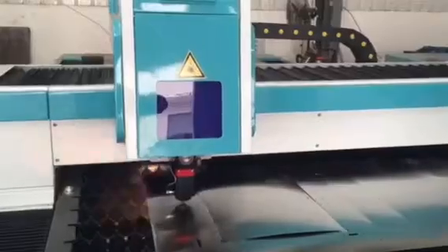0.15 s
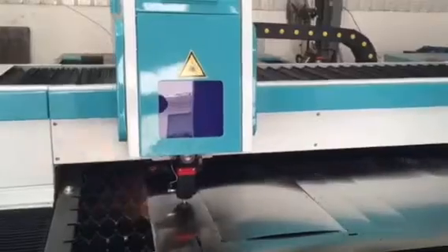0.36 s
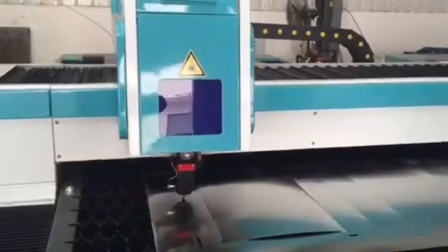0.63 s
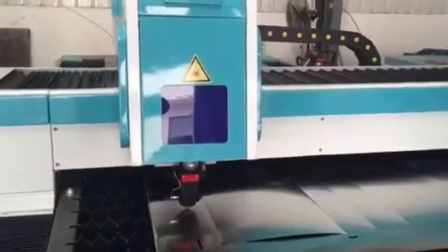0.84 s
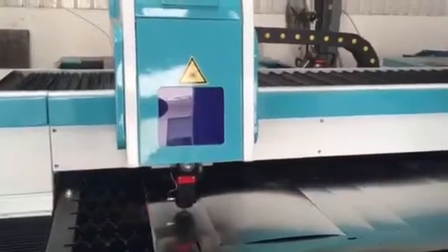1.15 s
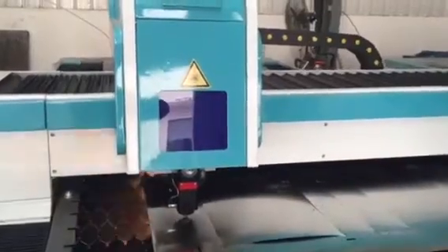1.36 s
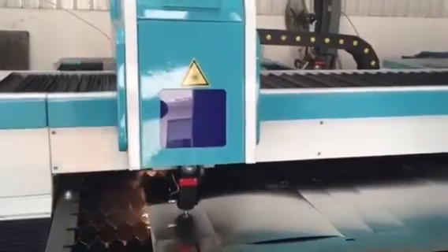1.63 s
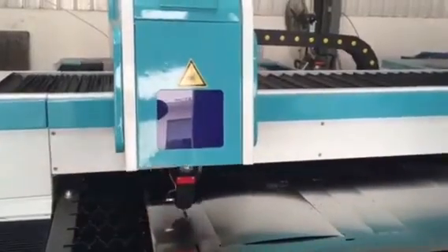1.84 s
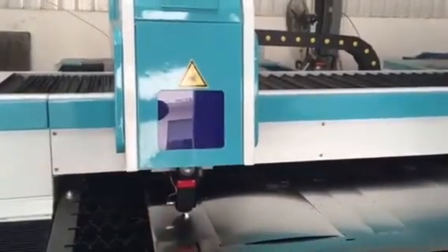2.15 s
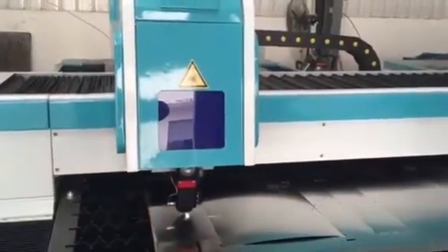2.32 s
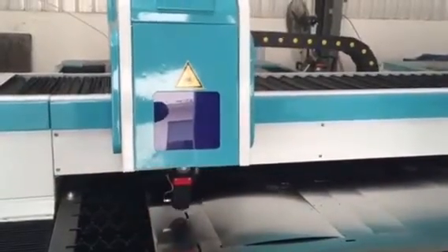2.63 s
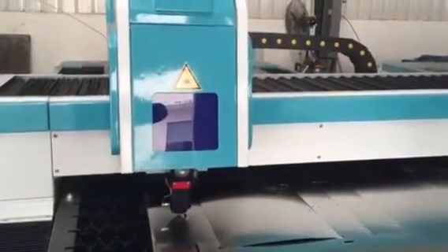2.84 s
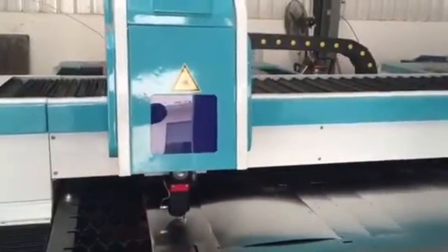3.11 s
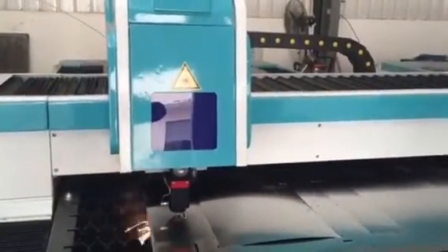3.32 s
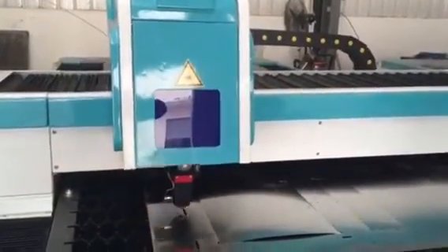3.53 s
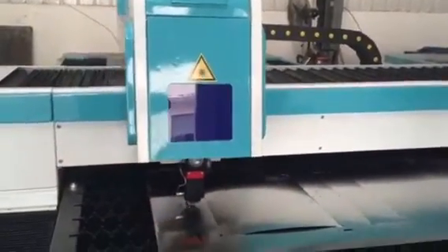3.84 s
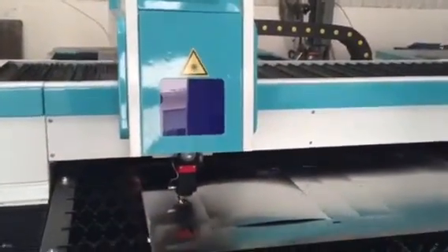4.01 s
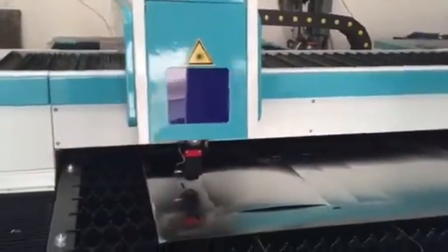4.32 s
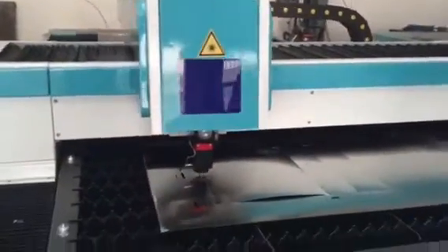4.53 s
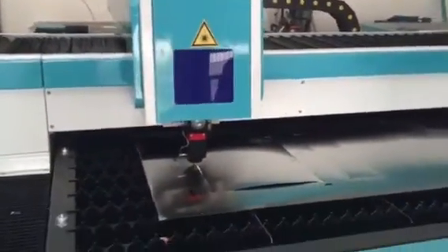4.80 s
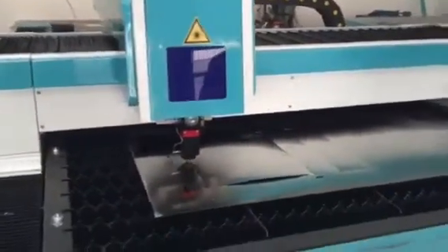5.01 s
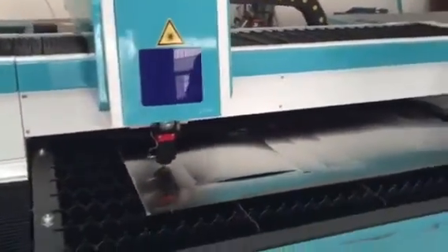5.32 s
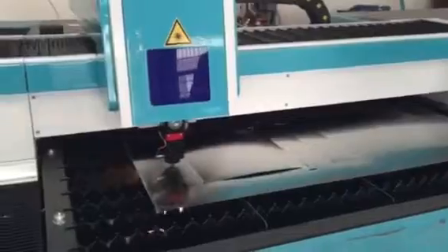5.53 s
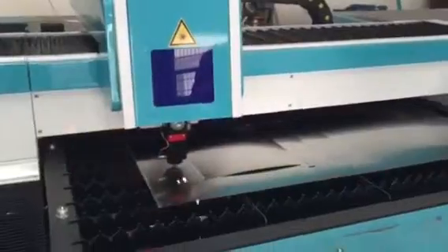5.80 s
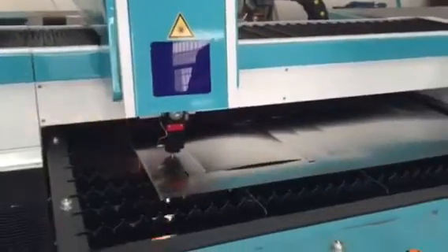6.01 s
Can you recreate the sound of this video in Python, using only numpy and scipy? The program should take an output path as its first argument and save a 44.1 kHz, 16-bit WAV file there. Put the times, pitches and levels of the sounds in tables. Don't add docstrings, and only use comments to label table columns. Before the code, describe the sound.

A laser cutter's gas jet hisses and roars through thin sheet metal, with sharp metallic snaps, brief whistles and low fan hum in a workshop.

```python
import sys
import numpy as np
from scipy import signal
from scipy.fft import rfft, irfft
from scipy.io import wavfile
from scipy.ndimage import uniform_filter1d

SR = 44100
rng = np.random.default_rng(int(sys.argv[2]) if len(sys.argv) > 2 else 0)


def voltage_ratio(level):
    return 10 ** (np.asarray(level, float) / 20)


def store_wav(level_fs):
    pcm = np.round(np.clip(np.atleast_2d(level_fs), -1, 1) * 32767)
    wavfile.write(sys.argv[1], SR, pcm.T.astype(np.int16))


N = 271656
T = np.arange(N) / SR
HZ = np.fft.rfftfreq(N, 1 / SR)

# time_s, level_db
FAN_LEVEL = [(0.0, -37.5), (0.68, -36.5), (1.22, -37.5), (1.92, -37.5), (2.95, -40), (3.29, -37),
             (3.96, -39.5), (4.37, -39.5), (4.72, -38.5), (5.2, -35.5), (6.04, -36.5), (6.16, -35.5)]
# frequency_hz, density_db (per Hz)
FAN_COLOUR = [(15, -44), (25, -21), (54, -2.5), (107, 2.5), (236, 3), (267, -2.5), (395, -5), (474, -10.5),
              (609, -0.5), (700, -3.5), (910, -45), (1540, -120)]
# pitch_hz, level_db
MOTOR_TONES = [
    (99, -53),
    (197, -51),
    (242, -48),
]
# start_s, end_s, level_db
GUSTS = [
    (1.12, 1.13, -36),
    (1.958, 2.005, -29),
    (2.654, 2.759, -28),
    (3.61, 3.664, -25.5),
    (3.685, 3.72, -26),
    (4.39, 4.53, -32.5),
    (5.237, 5.327, -34),
]
GUST_RISE_S, GUST_FALL_S = .007, .006
# frequency_hz, density_db (per Hz)
GUST_COLOUR = [(20, -46), (38, -20), (55, -3.0), (200, -5), (450, -12), (900, -22), (3000, -72)]
# start_s, peak_db, pitch_hz
BUMPS = [
    (1.105, -28, 120),
    (2.665, -9, 200),
    (2.715, -16, 200),
    (2.741, -20, 120),
    (3.631, -12.5, 111),
    (3.654, -21, 170),
    (3.715, -16, 160),
    (4.411, -22, 180),
    (4.458, -19, 200),
    (4.514, -10.5, 119),
]
# start_s, peak_db, ring_db (relative), first_pitch_hz
SNAPS = [
    (.6185, -13.5, -10, 2600),
    (1.804, -17, -7, 3300),
    (2.5288, -11.5, -6, 2800),
    (2.662, -20, -9, 2000),
    (3.4786, -9.5, -4, 3600),
    (5.0778, -13.5, -9, 3100),
]
# pitch_hz, level_db, decay_t60_s
SHEET_MODES = [
    (620, -4, .03),
    (1150, -9, .02),
    (2000, -6, .02),
    (2950, 0, .04),
]
# start_s, end_s, from_hz, to_hz, level_db
WHISTLES = [(0.01, .16, 3000, 3500, -34), (0.622, 0.689, 1694, 1094, -28), (.74, 0.88, 2960, 3410, -28),
            (.52, .62, 3000, 3190, -34), (1.028, 1.33, 3050, 3240, -35.5),
            (1.803, 1.866, 3200, 3000, -20.5), (1.821, 1.887, 1143, 1104, -23.5),
            (1.895, 1.987, 3000, 3200, -23), (1.895, 1.977, 3900, 4330, -23),
            (2.164, 2.228, 3100, 3920, -24), (2.253, 2.724, 2320, 2310, -30),
            (3.003, 3.04, 2890, 3110, -20.5), (2.54, 2.62, 1060, 1170, -27), (3.188, 3.24, 3350, 3400, -24),
            (3.28, 3.34, 3300, 3520, -23.5), (3.57, 3.63, 4000, 4400, -20),
            (4.399, 4.485, 3300, 1498, -16.5), (5.085, 5.224, 1100, 1802, -27),
            (5.083, 5.12, 3100, 2900, -28), (5.201, 5.237, 2390, 3080, -26.5),
            (5.26, 5.33, 2000, 3200, -30)]
STEADY_WIDTH_HZ, WIDTH_PER_GLIDE = 70, 1.05
JET_ZONES_HZ = [
    900,
    1950,
    3400,
    5900,
    9000,
]
# frequency_hz, density_db (per Hz)
JET_COLOUR = [(210, -20), (350, -15.5), (475, -22.5), (616, -14.5), (755, -10.5), (2270, -3), (3410, 1.5),
              (3890, -2), (6360, -9.5), (7460, -10.5), (8880, -10), (10100, -12), (11200, -26),
              (14600, -60), (22000, -120)]
# centre_hz, width_hz, lift_db
BED_RESONANCES = [(620, 75, 4), (765, 50, -4), (875, 40, 3), (1140, 60, 3), (1310, 50, -4), (1470, 55, 4.5),
                  (1560, 60, -2), (1890, 50, -4.5), (1960, 60, 2), (2315, 90, 5), (2440, 80, -4),
                  (2595, 110, 2.5), (2780, 70, 2.5), (2905, 40, -3), (2955, 50, 4), (3250, 60, -4.5),
                  (3380, 70, 3.5), (4060, 45, 4), (4170, 80, 3), (4270, 60, 2), (4530, 60, 2.5),
                  (5000, 150, -2), (5400, 100, 2), (5780, 50, -3), (6145, 60, 3), (6270, 65, 4),
                  (6530, 60, 2.5), (6840, 50, 3), (7600, 700, -3), (8660, 80, 4)]
IDLE_DB = [-7.5, -13, -18, -9.5, -6.5]
# peak_s, lift_db, half_length_s
SLATS = [(.14, 3.5, 0.072), (0.285, -4, 0.12), (.53, 1.5, 0.064), (1.19, -0.5, .05), (1.526, -2, 0.14),
         (1.882, -1.5, 0.1), (2.36, 0, .1), (2.67, -4.5, 0.052), (3.134, -2.5, 0.088), (3.25, 5.5, .025),
         (3.33, -1, .06), (3.417, -1, .06), (3.72, 2, .05), (4.16, 2, .14), (4.31, -4, 0.065),
         (5.02, -2.5, .05), (5.31, 4.5, .06), (5.42, 1, .06), (5.602, 1, .06), (5.793, -4.5, .06),
         (5.95, -3.5, 0.049)]
SLAT_SHARE = [0.54, 0.78, .3, 0.046, 0.05]
# start_s, end_s, lift_db, rise_s, fall_s
CUTS = [(-.1, 0.14, 3, .02, 0.044), (0.48, .88, 6.5, 0.13, 0.24), (0.98, 1.116, 4, 0.018, 0.13),
        (1.194, 1.32, 4.5, .08, 0.068), (1.658, 1.8, 6, 0.13, .011), (1.8, 2.079, 12, 0.012, .008),
        (2.08, 2.152, 11, 0.01, 0.035), (2.15, 4.266, 14, 0.028, 0.0052), (4.261, 4.478, 9.5, 0.0075, 0.13),
        (4.65, 5.343, 5.5, 0.057, .04), (5.187, 5.328, 3, .03, .015), (5.45, 5.617, 3.5, .02, 0.1),
        (5.842, 5.88, 2, .03, 0.029), (6.033, 6.3, 4.5, .06, .02)]
CUT_SHARE = [0.29, 1, 0.99, 0.68, .36]
# deepest_s, depth_db, sink_s, lift_s
CHOKES = [
    (.585, -1.5, 0.023, 0.025),
    (.99, -7, 0.041, 0.043),
    (2.11, -1, .03, .08),
    (2.848, -7, 0.023, 0.022),
    (2.86, -5, 0.091, 0.079),
    (3.472, -4, 0.013, .006),
    (3.835, -10.5, 0.052, 0.067),
    (4.64, -1.5, 0.062, .03),
    (5.16, 0, 0.029, .03),
    (5.45, -4, 0.044, .025),
]
CHOKE_SHARE = [.6, .8, .9, 1, 1.1]
# peak_s, lift_db, half_length_s
FLARES = [(.39, 3.5, 0.13), (.67, 3.5, 0.059), (0.804, 6.5, 0.09), (1.85, 1, 0.028), (1.965, 7, 0.084),
          (2.05, 2.5, 0.039), (2.22, 4.5, 0.1), (2.31, 3, .07), (2.493, 3.5, 0.15), (2.67, 4, 0.064),
          (2.734, 1.5, 0.043), (3.518, 5.5, 0.081), (3.024, 0.5, 0.086), (3.147, 0.5, 0.056),
          (3.42, 3.5, .05), (3.6, 4, .05), (3.648, 10, 0.044), (3.714, 6, 0.022), (4.408, 10.5, 0.038),
          (4.496, 3.5, 0.063), (4.783, 3.5, .06), (4.85, 2, 0.032), (4.914, 4.5, .04), (4.972, 7, .035),
          (5.088, 1.5, 0.11), (5.236, 7, 0.057), (5.28, 1.5, 0.065), (5.444, -6, .03), (5.983, 5, .04)]
FLARE_SHARE = [0.05, .1, .3, .85, 1.05]
# start_s, end_s, lift_db, fall_s
HOLLOWS = [
    (0.61, 0.678, 6, 0.31),
    (1.795, 1.866, 8.5, 0.27),
    (2.155, 2.22, 2.5, 0.033),
    (2.503, 2.59, 5, 0.35),
    (3.583, 3.725, 4.5, 0.059),
    (4.384, 4.47, 8, 0.13),
    (4.68, 4.93, 6.5, 0.059),
    (5.06, 5.302, 6.5, 0.036),
]
HOLLOW_SHARE = [0.89, 0.17, 0.033, 0.037, 0.069]
FILL_S = 0.018
# centre_s, low_hz, high_hz
SIDE_PATCHES = [(.074, 4130, 5250), (.074, 5590, 6970), (.26, 4130, 5250), (.492, 5160, 6370),
                (.492, 6900, 8350), (.492, 9600, 11000), (.585, 5160, 6970), (1.142, 5590, 6970),
                (1.281, 6200, 8350), (1.537, 5160, 6970), (2.28, 5590, 6970), (2.28, 7500, 8950),
                (3.046, 5590, 6970), (3.046, 8180, 9640), (3.139, 8900, 10350), (3.441, 8900, 10350),
                (4.045, 4130, 5770), (4.091, 4560, 5700), (4.323, 8180, 9640), (4.346, 5160, 6370),
                (4.741, 8900, 10350), (5.159, 7570, 10350), (5.298, 4130, 5770), (5.716, 4130, 5250),
                (5.809, 8900, 10350), (6.134, 4130, 7570)]


def colour(points):
    hz, db = np.transpose(points)
    return voltage_ratio(np.interp(np.log(HZ + 1), np.log(hz), db))


def unit(x):
    return x / np.sqrt(np.mean(x ** 2))


def walk(rate, size=N):
    hold = int(SR / rate)
    steps = np.repeat(rng.standard_normal(size // hold + 1), hold)
    smooth = uniform_filter1d(uniform_filter1d(steps, hold), hold)
    return unit(smooth[:size])


def swell(on, off, rise, fall):
    return np.clip((T - on) / rise, 0, 1) * np.clip(1 + (off - T) / fall, 0, 1)


def bands(gain, lo_hz, count):
    noise = rfft(rng.standard_normal(N)) * gain
    place = 3 * np.log2((HZ + 1) / lo_hz)
    windows = (np.cos(np.pi / 2 * np.clip(place - k, -1, 1)) ** 2 for k in range(count))
    return [irfft(noise * window, N) for window in windows]


def fan_rumble(flicker_db=2.5):
    parts = bands(colour(FAN_COLOUR), 26.35, count=16)
    air = unit(sum(part * voltage_ratio(flicker_db * walk(6)) for part in parts))
    hum = 0
    for hz, db in MOTOR_TONES:
        level = voltage_ratio(db + 1.2 * walk(4.6))
        turn = 2 * np.pi * np.cumsum(hz + 1.486 * walk(4)) / SR
        hum = hum + level * np.sin(turn)
    s, db = np.transpose(FAN_LEVEL)
    return air * voltage_ratio(np.interp(T, s, db) + 2.2) + np.sqrt(2) * hum


def gusts(lumpy_db=1.8):
    wind = unit(irfft(rfft(rng.standard_normal(N)) * colour(GUST_COLOUR), N))
    wind = wind / np.sqrt(uniform_filter1d(wind ** 2, 2500))
    gate = sum(voltage_ratio(db) * swell(on, off, GUST_RISE_S, GUST_FALL_S) for on, off, db in GUSTS)
    out = wind * gate * voltage_ratio(lumpy_db * walk(70))
    t = T[:SR // 20]
    for s, db, hz in BUMPS:
        turns = hz * (t + 0.0029 * (1 - np.exp(-t / 0.0014)))
        bump = np.sin(2 * np.pi * turns) * np.exp(-t / 0.0069) * 0.56
        out[int(s * SR):][:len(t)] += voltage_ratio(db) * bump
    return out


def snaps():
    t, out = T[:SR // 10], np.zeros(N)
    detune = rng.standard_normal((len(SNAPS), len(SHEET_MODES)))
    last_hz, sag_s = 520, .0014
    fade = np.exp(-(t / .0045) ** 4)
    plain = (.55 + t / .006) * fade
    spiked = (.55 + t / .006 + np.exp(-t / .0004)) * fade
    ring_onset = 1 - np.exp(-(t / .002) ** 2)
    for (s, db, ring_db, first_hz), jitter in zip(SNAPS, detune):
        turns = last_hz * t + (first_hz - last_hz) * sag_s * (1 - np.exp(-t / sag_s))
        shape = spiked if first_hz > 3000 else plain
        chirp = np.sin(2 * np.pi * turns) * shape
        ring = 0
        for (hz, mode_db, t60), j in zip(SHEET_MODES, jitter):
            mode = np.sin(2 * np.pi * hz * (1 + 0.019 * j) * t)
            ring = ring + voltage_ratio(mode_db) * mode * 1000 ** (-t / t60)
        out[int(s * SR):][:len(t)] += voltage_ratio(db) * (chirp + voltage_ratio(ring_db) * ring * ring_onset)
    return out


def whistles():
    out = np.zeros(N)
    for on, off, from_hz, to_hz, db in WHISTLES:
        width_hz = STEADY_WIDTH_HZ + WIDTH_PER_GLIDE * abs(to_hz - from_hz)
        span = slice(int(on * SR), int(off * SR))
        share = (T[span] - on) / (off - on)
        turn = 2 * np.pi * np.cumsum(from_hz + (to_hz - from_hz) * share) / SR
        rough = walk(width_hz, size=len(turn)) * np.sin(turn)
        rough = rough + walk(width_hz, size=len(turn)) * np.cos(turn)
        out[span] += voltage_ratio(db) * np.abs(np.sin(np.pi * share)) ** .5 * rough
    return out


def jet_flow():
    slat = sum(db * swell(s - half, s, half, half) for s, db, half in SLATS)
    cut = sum(db * swell(on, off, rise, fall) for on, off, db, rise, fall in CUTS)
    choke = sum(db * swell(s - sink, s, sink, lift) for s, db, sink, lift in CHOKES)
    flare = sum(db * swell(s - half, s, half, half) for s, db, half in FLARES)
    hollow = sum(db * swell(on, off, FILL_S, fall) for on, off, db, fall in HOLLOWS)
    shares = np.transpose([SLAT_SHARE, CUT_SHARE, CHOKE_SHARE, FLARE_SHARE, HOLLOW_SHARE])
    return np.array(IDLE_DB)[:, None] + shares @ [slat, cut, choke, flare, hollow]


def jet(eddy_db=0.4, flicker_db=0.75, patchy_db=0.95):
    zones = jet_flow() + patchy_db * np.array([walk(18) for _ in JET_ZONES_HZ])
    lift = sum(db / (1 + (2 * (HZ - hz) / width) ** 2) for hz, width, db in BED_RESONANCES)
    parts = bands(colour(JET_COLOUR) * voltage_ratio(lift), 306, count=17)
    scale = voltage_ratio(-14.5) / np.sqrt(np.mean(sum(parts) ** 2))
    eddies, out = eddy_db * walk(60), 0
    for k, part in enumerate(parts):
        place = np.log(300 * 2 ** (k / 3))
        share = [np.interp(place, np.log(JET_ZONES_HZ), row) for row in np.eye(len(zones))]
        out = out + part * voltage_ratio(share @ zones + eddies + flicker_db * walk(12))
    return scale * out


def scene():
    mono = fan_rumble() + gusts() + snaps() + whistles() + jet()
    return np.tile(mono, (2, 1))


def sparse_treble(x):
    hz, _, z = signal.stft(x, SR, nperseg=3072)
    treble = np.mean(np.abs(z[(hz > 9000) & (hz < 10000)]), axis=0)
    hz = hz[:, None]
    z = z * voltage_ratio(4.5 * np.clip((hz - 10350) / 600, 0, 1)) * (hz < 10960)
    keep = (hz < 10330) | (np.abs(z) > voltage_ratio(-1.5) * treble)
    return signal.istft(z * keep, SR, nperseg=3072)[1][:N]


def side_patches(mid, side_db=-4.5):
    size = 2048
    side, hz = np.zeros(N + size), np.fft.rfftfreq(size, 1 / SR)
    chance = rng.standard_normal((len(SIDE_PATCHES), size))
    for (s, lo_hz, hi_hz), noise in zip(SIDE_PATCHES, chance):
        i = int(s * SR) - size // 2
        band = (hz > lo_hz) & (hz < hi_hz)
        loudness = np.linalg.norm(rfft(mid[i:], size)[band])
        patch = rfft(noise) * band
        patch = irfft(patch * loudness / np.linalg.norm(patch))
        side[i:i + size] += patch * np.hanning(size) ** .5
    return voltage_ratio(side_db) * side[:N]


def band_limit(x):
    return signal.sosfilt(signal.butter(12, 11400, fs=SR, output="sos"), x)


def record(dry):
    soft = 1.2 * np.tanh(dry[0] / 1.2)
    mid = sparse_treble(soft)
    side = side_patches(mid)
    return band_limit(np.array([mid + side, mid - side]))


dry = scene()
out = record(dry)
store_wav(out)
```